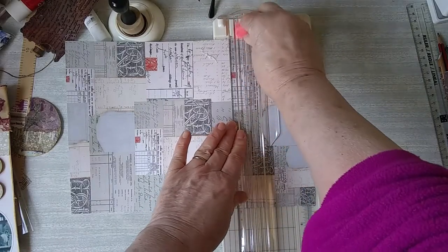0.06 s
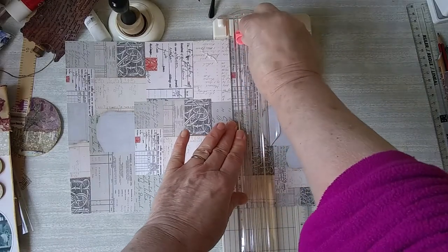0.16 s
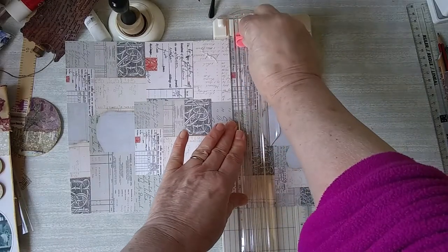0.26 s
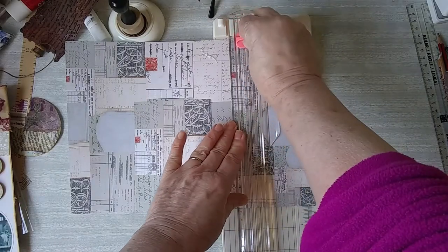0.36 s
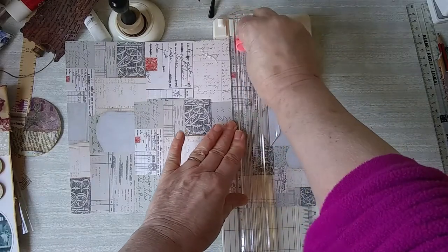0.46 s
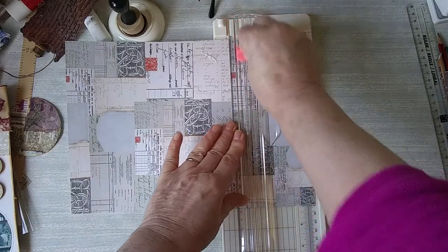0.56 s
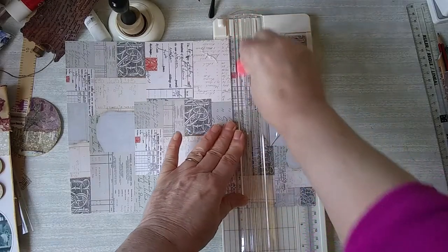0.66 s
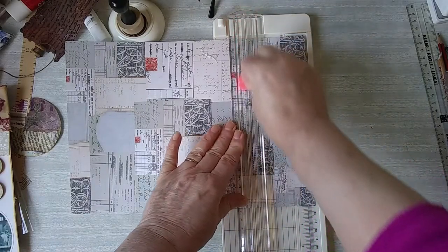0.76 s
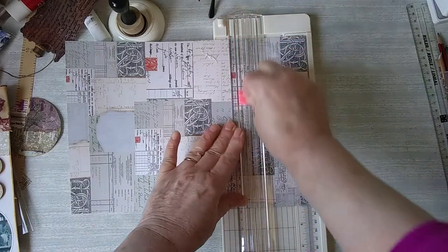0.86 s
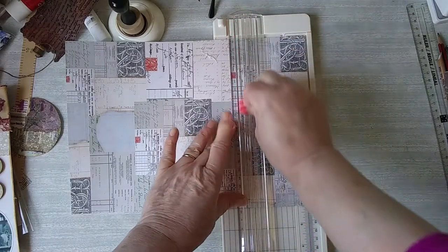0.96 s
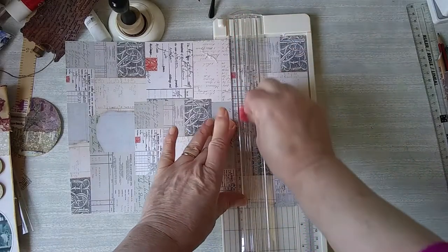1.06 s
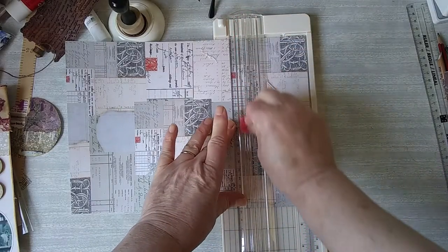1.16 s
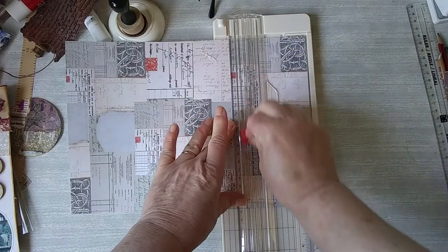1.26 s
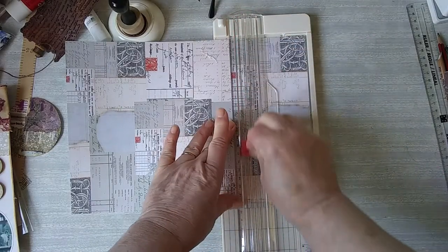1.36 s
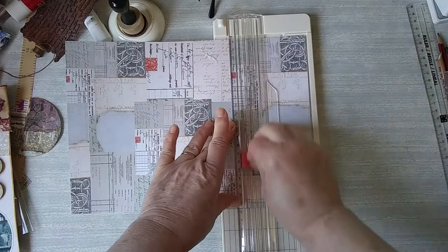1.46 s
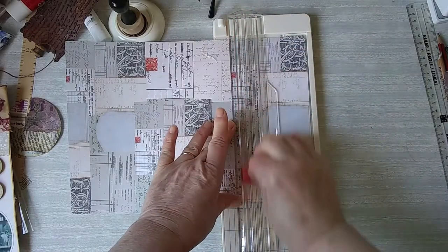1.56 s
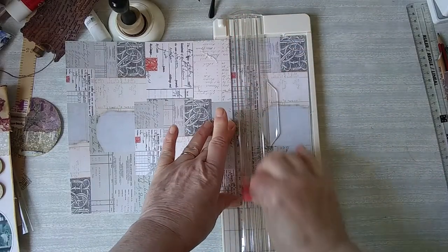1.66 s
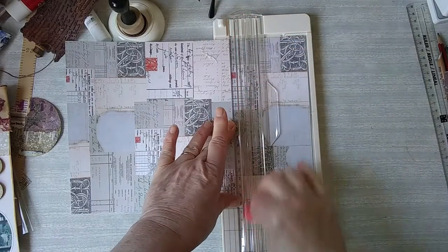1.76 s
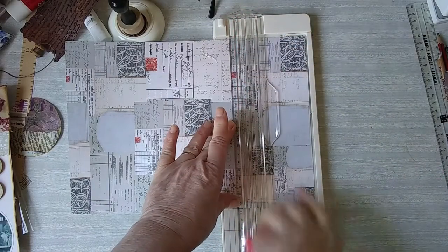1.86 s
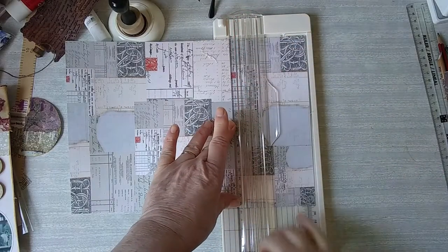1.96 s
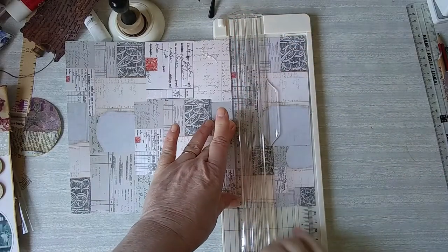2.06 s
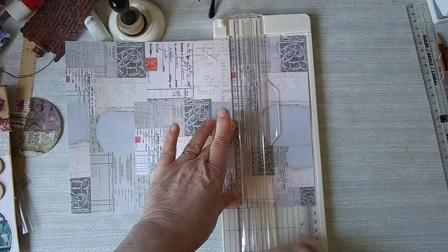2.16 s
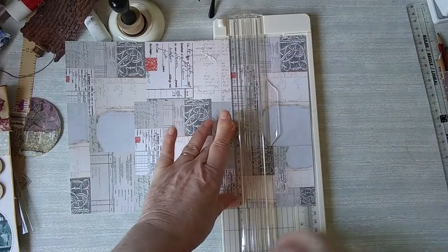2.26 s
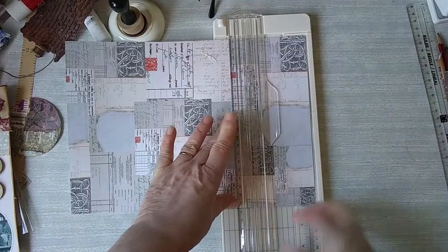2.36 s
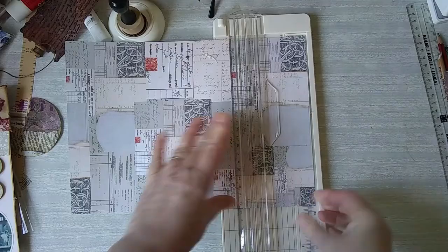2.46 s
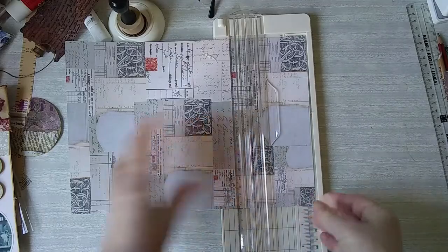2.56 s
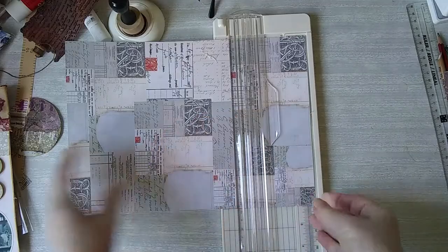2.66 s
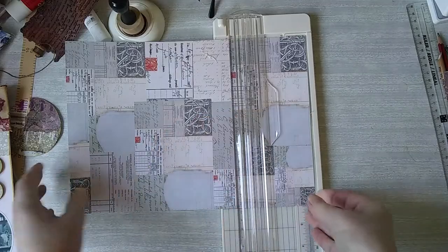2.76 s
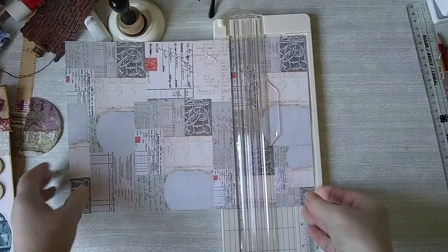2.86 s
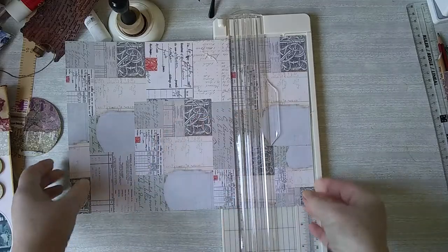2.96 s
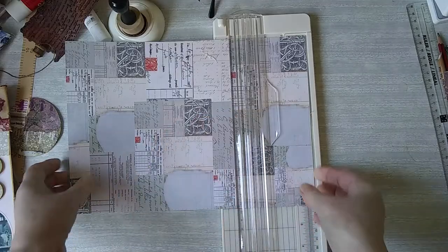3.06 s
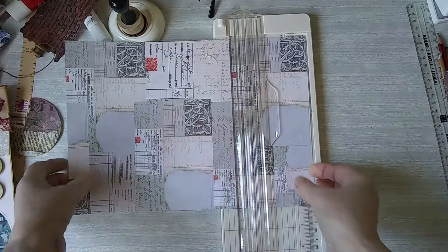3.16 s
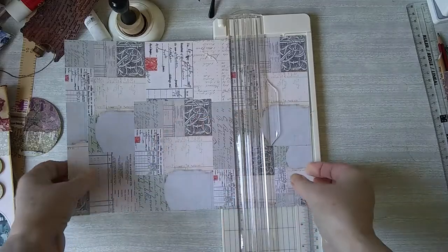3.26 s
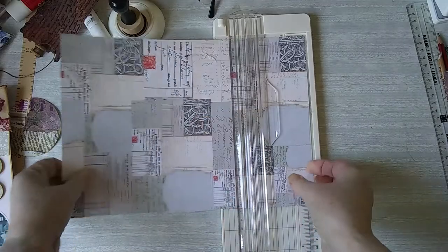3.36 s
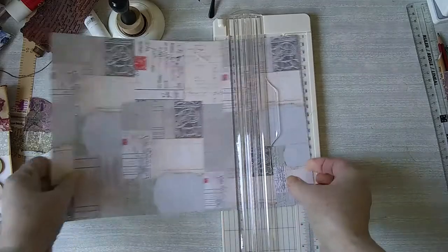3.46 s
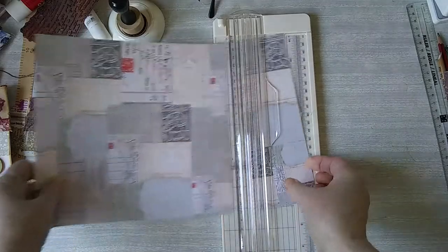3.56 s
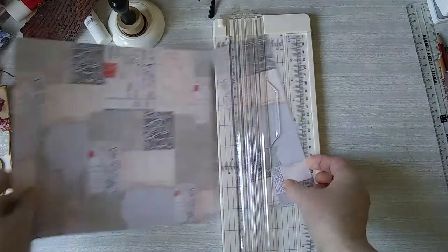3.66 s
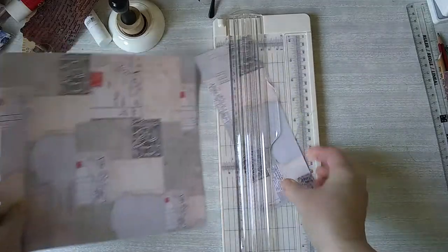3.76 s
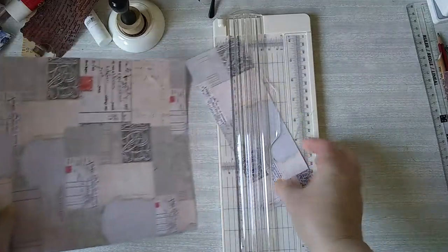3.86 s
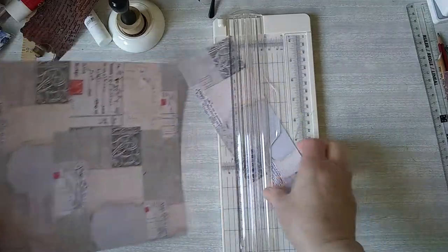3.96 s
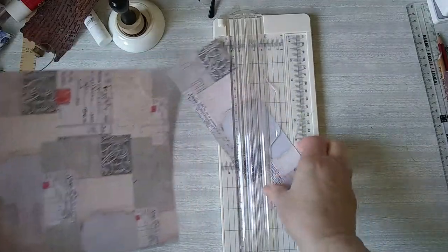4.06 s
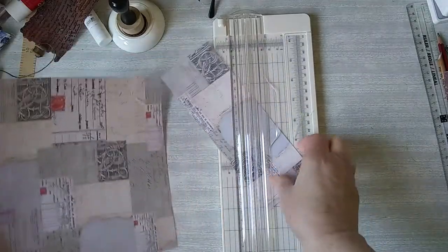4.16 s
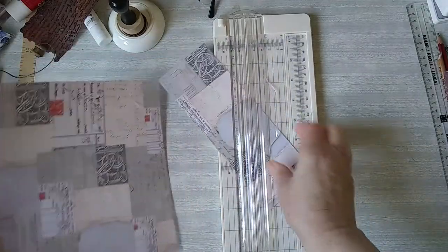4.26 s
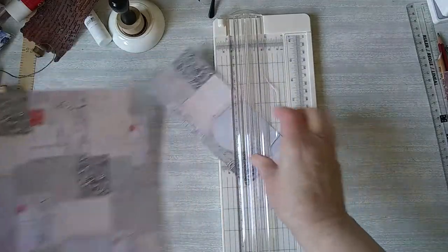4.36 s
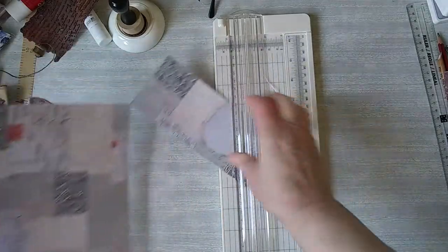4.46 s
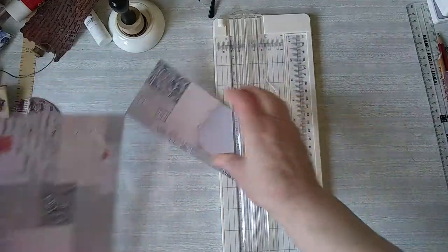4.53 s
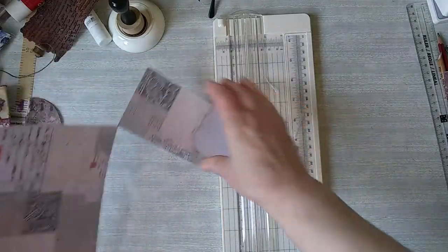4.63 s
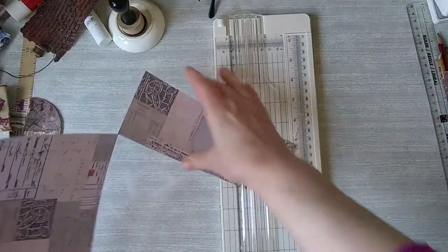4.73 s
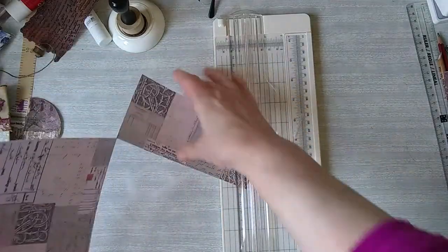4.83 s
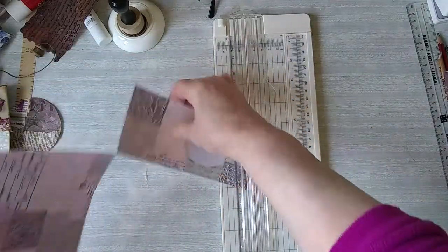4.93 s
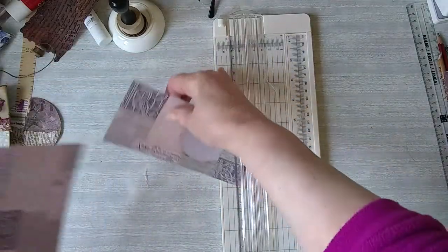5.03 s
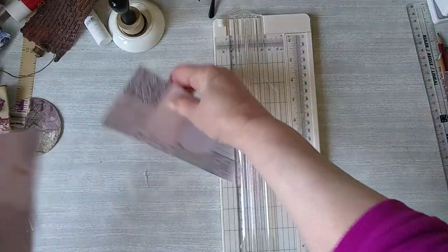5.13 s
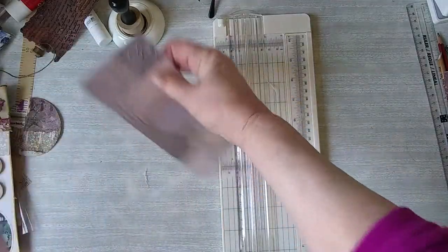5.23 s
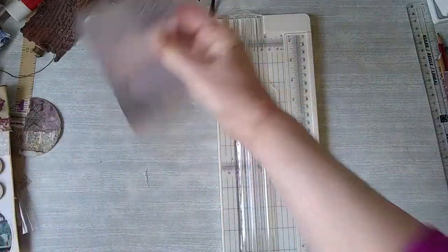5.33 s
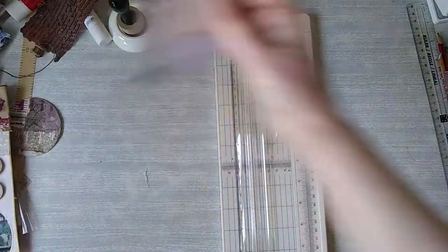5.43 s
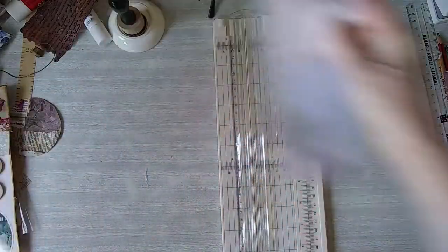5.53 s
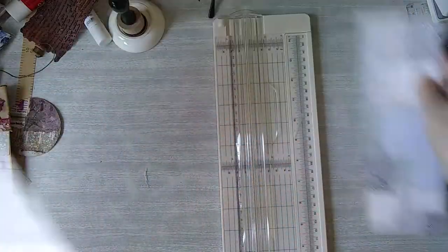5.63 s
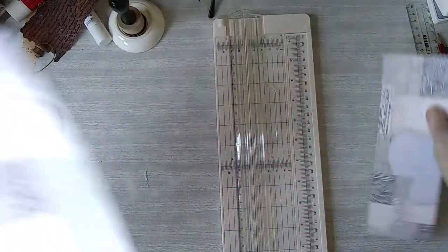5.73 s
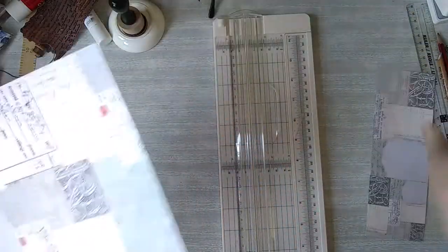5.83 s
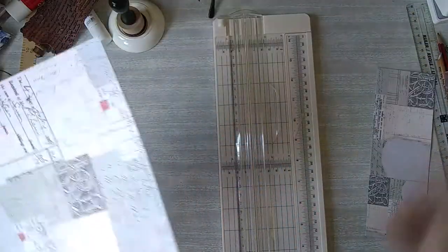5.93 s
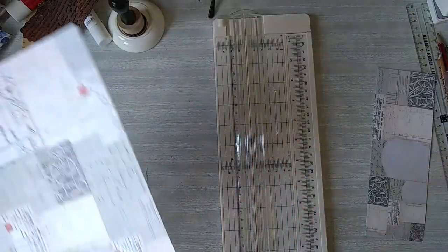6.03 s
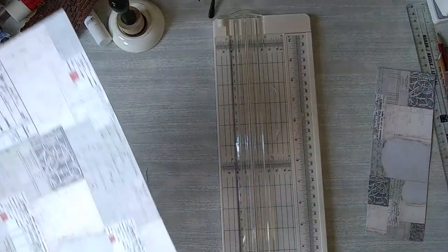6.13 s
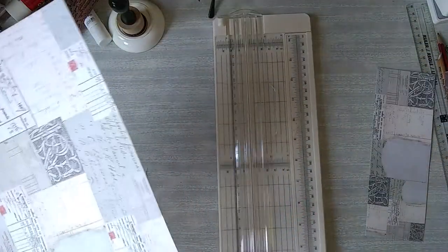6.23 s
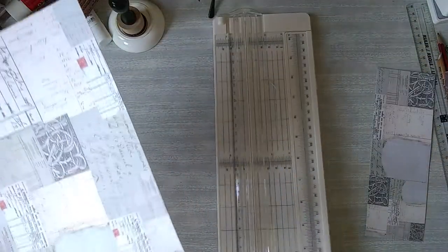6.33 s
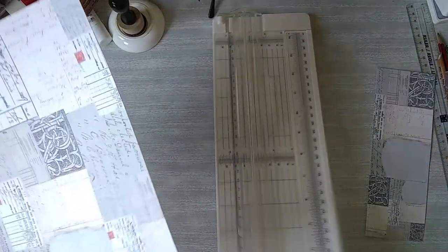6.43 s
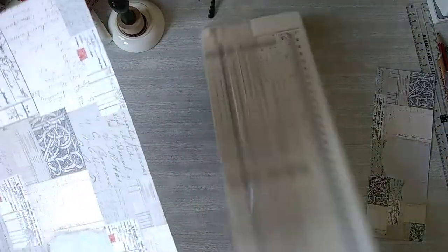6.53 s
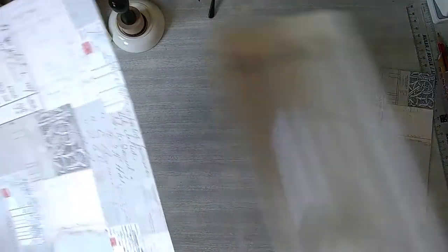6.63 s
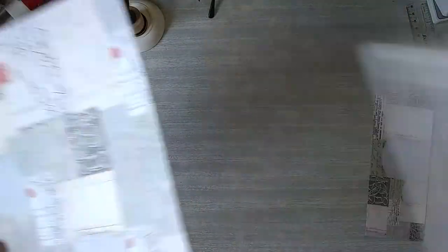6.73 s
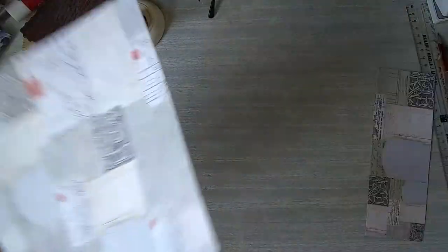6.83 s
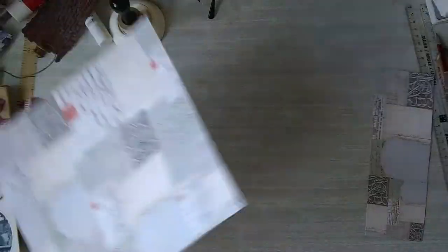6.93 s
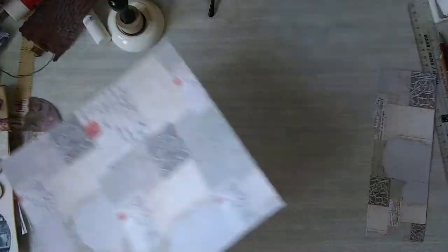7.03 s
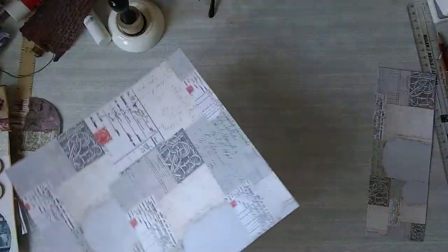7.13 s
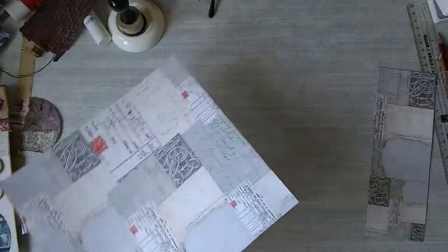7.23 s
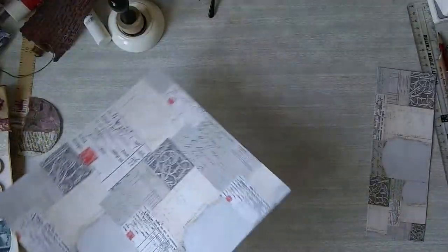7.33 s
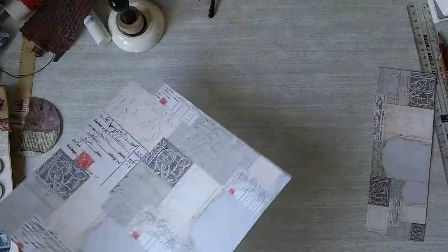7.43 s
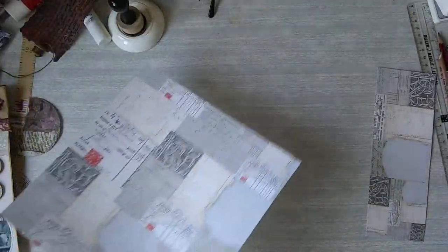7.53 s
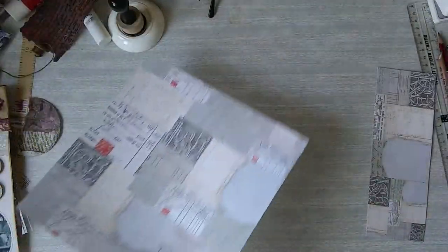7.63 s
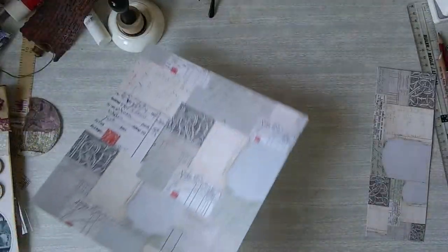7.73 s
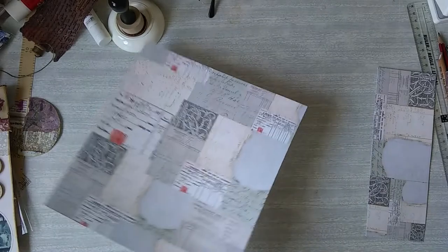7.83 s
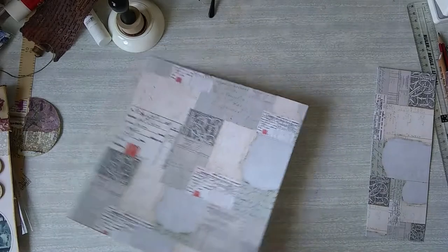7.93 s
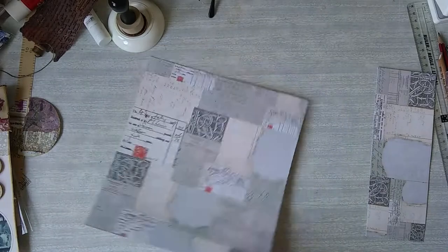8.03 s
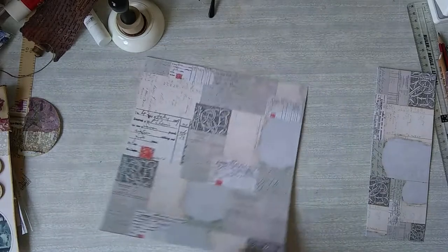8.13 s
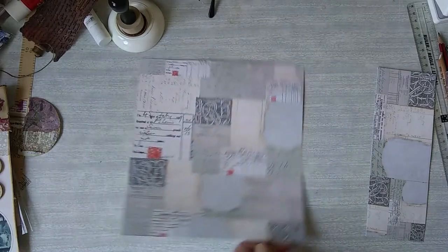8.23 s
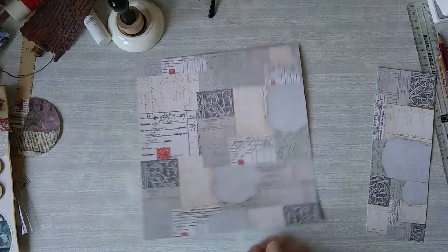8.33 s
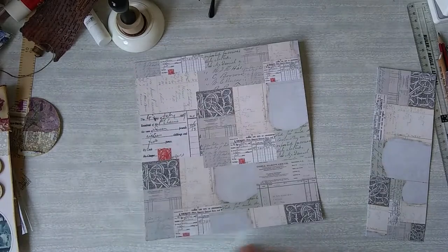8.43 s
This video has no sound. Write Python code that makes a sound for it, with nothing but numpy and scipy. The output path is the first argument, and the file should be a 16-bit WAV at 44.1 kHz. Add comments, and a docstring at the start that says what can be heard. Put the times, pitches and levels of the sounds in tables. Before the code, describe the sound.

Over the faint hush of a quiet room, a paper trimmer's slider is nudged with small clicks at about 0.2 seconds. From 0.4 to 1.8 seconds the blade rasps through card in one stroke, drumming the plastic bed. A tiny ping follows near 2 seconds, then scattered light taps. From about 3.4 to 5 seconds the cut pieces are dragged free with uneven papery hisses and small knocks on plastic and desk. Around 5.2 seconds the offcut is flicked away with a bright swish and a cluster of knocks, and card snaps sharply at 5.8. From 6.2 to 6.5 seconds the trimmer clatters as it is lifted, the loudest event. The sheet fans soft, low puffs of air around 7.3 seconds, then glides over the desk with a fine hiss, ending with light ticks near 8.4. The sound is close, in wide stereo.

```python
"""A sliding trimmer cuts a sheet of card on a desk, under a camera in a quiet room.
First the blade is nudged in and rasps down its rail, parting fibres and drumming the plastic bed.
Then the pieces are dragged free with a hiss and the offcut is flicked away. The trimmer clatters
as it is lifted off; last, the sheet fans the air and glides back into place. Throughout, the camera
widens its stereo picture by subtracting each microphone, delayed, from the other."""
import sys
import numpy as np
from scipy import signal
from scipy.fft import rfft, irfft, next_fast_len
from scipy.io import wavfile
from scipy.ndimage import uniform_filter1d

SR = 44100
rng = np.random.default_rng(int(sys.argv[2]) if len(sys.argv) > 2 else 0)


def materialize(psi):
    """Save the field psi as 16-bit PCM at rate SR to the path in sys.argv[1].

    A 1-D psi becomes a single channel; in a 2-D psi each row is a channel.
    """
    bounded = np.clip(np.atleast_2d(psi).T, -1, 1)
    quanta = np.round(bounded * 32767).astype(np.int16)
    wavfile.write(sys.argv[1], SR, quanta)


N = 374409
TIME = np.arange(N) / SR

# the blade's long stroke: t/s, drumming of the bed/dB, rasp of the fibres/dB
CUT_STROKE = [(0.42, -47, -53.5), (0.46, -42, -49.5), (0.59, -46.5, -40), (0.70, -46.5, -40),
              (0.848, -38.5, -40.5), (0.9, -44, -41.5), (1.06, -46, -42), (1.25, -47, -39),
              (1.38, -47, -40), (1.514, -48.5, -40), (1.604, -45.5, -38), (1.73, -50.5, -37),
              (1.78, -41, -39.5)]
# nudges before the stroke: t/s, length/s, speed peak/share of length, drumming/dB, rasp/dB
BLADE_NUDGES = [(.198, 0.13, 0.16, -47.5, -54.5), (.335, 0.12, 0.15, -48.5, -54)]
# tone of the cut at the far and near ends of the rail: f/Hz, level/dB
CUT_FAR_TONE = [(40, -19), (90, -14.5), (165, -1.5), (240, -24), (430, -3), (530, -13), (780, -2.5),
                (1050, -17), (1250, -9.5), (2000, -2), (4300, -0.5), (6200, -1), (10000, -5.5),
                (14000, -10.5)]
CUT_NEAR_TONE = [(40, -39), (90, -6.5), (165, -1.5), (240, -11), (380, -4), (600, -7.5), (950, -7.5),
                 (1700, -13), (2300, -7.5), (3700, -2.5), (5000, -5.5), (6000, -7.5), (10000, -9),
                 (14000, -15.5)]
# desk, bed and rail speak as the slider passes: t/s, spread/s, f/Hz, half-width/Hz, level/dB
RAIL_RESONANCES = [(0.584, 0.05, 164, 13, -43), (1.4, 0.13, 164.7, 7.3, -48), (1.0, 0.35, 118, 8.6, -53),
                   (1.36, 0.73, 300, 19, -58), (0.574, 0.11, 431, 14, -47.5), (1.2, 0.091, 398, 28, -49.5),
                   (1.77, 0.042, 452, 24, -54), (0.47, 0.04, 790, 35, -48), (0.6, .07, 785, 45, -43.5),
                   (0.745, 0.096, 867, 66, -47.5), (0.55, 0.042, 660, 47, -49), (0.81, 0.21, 690, 66, -46),
                   (0.66, 0.096, 970, 17, -54), (0.667, 0.093, 1232, 37, -48),
                   (1.253, 0.053, 3470, 59, -46), (1.15, 0.22, 1590, 41, -54),
                   (1.34, 0.47, 1760, 157, -48.5), (1.15, 0.05, 5700, 160, -56),
                   (1.5, 0.14, 5660, 320, -49), (1.63, 0.11, 1155, 50, -50.5), (1.62, 0.077, 3970, 90, -50),
                   (1.6, 0.09, 3600, 110, -51), (1.4, 0.25, 2860, 34, -55)]
# card and trimmer pushed over each other and the desk, then the big sheet over the bare desk:
# t/s, length/s, speed peak/share of length, drumming/dB, hiss/dB
CARD_SLIDES = [(2.63, 0.22, 0.61, -59, -76), (2.93, 0.34, 0.41, -61, -73), (3.4, 0.3, 0.22, -51, -43.5),
               (3.53, 0.44, 0.24, -48, -39.5), (3.77, 0.082, 0.89, -52, -44.5),
               (3.91, 0.31, 0.19, -49, -46), (4.27, 0.34, 0.43, -53.5, -47), (4.52, 0.16, 0.49, -53, -51.5),
               (4.62, 0.15, 0.78, -57.5, -65), (4.85, 0.44, 0.16, -52.5, -50.5),
               (4.955, 0.055, 0.48, -44.5, -38), (5.1, 0.085, 0.5, -56, -37),
               (5.09, 0.205, 0.58, -47.5, -30.5), (5.38, 0.14, 0.59, -58, -54.5),
               (5.75, 0.052, 0.66, -47.5, -55), (6.18, 0.39, 0.5, -46.5, -55),
               (6.42, 0.5, 0.51, -58.5, -64.5), (6.73, 0.43, 0.43, -55, -59), (7.02, 0.47, 0.58, -62, -63)]
SHEET_GLIDES = [(7.46, 0.15, 0.32, -60, -51.5), (7.52, 0.24, .5, -67, -66), (7.68, 0.11, 0.4, -70, -51),
                (7.64, 0.21, 0.4, -59.5, -46), (7.74, 0.21, 0.37, -70, -54.5),
                (7.84, .26, 0.55, -63.5, -53.5), (8.0, 0.29, 0.35, -73, -58.5),
                (8.19, .12, 0.34, -76, -50.5), (8.295, .058, 0.36, -82, -52), (8.33, 0.28, 0.13, -68, -60)]
# card skids where it is touched or lands: t/s, decay/s, drumming/dB, hiss/dB
CARD_SCUFFS = [(1.785, 0.19, -62, -59.5), (1.96, 0.1, -66, -59.5), (2.905, 0.042, -56.5, -72),
               (3.104, 0.1, -52.5, -61.5), (3.295, 0.25, -55.5, -60.5), (3.41, .03, -51, -50),
               (4.158, 0.57, -58, -67), (4.98, 0.042, -44, -45), (5.28, 0.026, -37, -46),
               (5.795, 0.018, -43, -40), (5.825, 0.03, -46, -39), (6.192, 0.032, -34.5, -45.5),
               (6.285, 0.04, -44, -43), (6.467, 0.011, -45, -48.5), (6.965, 0.019, -44.5, -44.5)]
# tone of card sliding on its face, whisked on its edge and gliding on the desk: f/Hz, level/dB
FACE_TONE = [(40, -37), (130, -14), (300, 0.5), (450, 1), (750, -14.5), (1100, -5.5), (1700, -1), (2400, 1),
             (3200, 2.5), (4600, 1.5), (7000, -2), (10500, -7.5), (14000, -24.5)]
EDGE_TONE = [(40, -7), (130, -2.5), (300, 5), (800, 6), (1200, -2), (1700, -4.5), (3300, -2.5),
             (4600, -6.5), (7000, -6.5), (10500, -6), (14000, -11)]
GLIDE_TONE = [(40, -12), (130, -11), (450, 8), (800, 1.5), (1500, -3), (2400, -4.5), (3300, -3),
              (4600, -4.5), (6000, -5), (8000, -3.5), (10300, -5.5), (14000, -12)]
# hits on trimmer and desk: t/s, thud/dB, ring/dB, crack/dB, thud tilt and ring tilt/(dB per octave)
KNOCK_HITS = [(0.215, -53, -49, -44, 8, 2), (0.239, -44, -43, -38.5, 11, 0), (0.341, -52, -57, -43, 0, 0),
              (2.135, -46, -47, -66, 6, -5), (2.148, -46.5, -47, -64, 2, -7), (2.385, -71, -41, -46, -5, 2),
              (2.645, -48, -46, -55, 1, -3), (2.774, -64, -47, -53, 2, 2), (2.7851, -47, -46, -56, -6, 5),
              (2.908, -42.5, -48, -48, -6, 5), (3.104, -46, -43, -47, -2, 4), (3.293, -53, -45, -52, 3, -5),
              (3.3394, -46, -41, -58, -2, -10), (3.348, -48, -43, -58, 2, -7),
              (3.431, -43, -38.5, -46, 1, -5), (3.438, -46, -37, -46, 4, -2),
              (3.6666, -38.5, -31.5, -43, 18, -9), (3.733, -39, -37, -54, 2, -7),
              (3.9881, -39, -29.5, -48, 4, -5), (4.034, -49, -39.5, -46, 6, -8),
              (4.107, -48, -41.5, -56, 7, -14), (4.1573, -43, -39, -36, 3, -2),
              (4.861, -43.5, -44.5, -63, 9, 2), (4.984, -36.5, -42, -38, 9, 4),
              (5.224, -28.5, -22, -22.5, 3.5, -7), (5.2305, -23, -18, -30, 4, 0),
              (5.263, -42, -26, -22, 7, -5), (5.2672, -28.5, -27, -23.5, 6, -8),
              (5.283, -40, -36, -46, -1, -10), (5.297, -40, -27, -37, -4, 3),
              (5.5516, -42, -63, -65, 1, -3), (5.7609, -48, -46.5, -56, 6, -2),
              (5.8033, -48, -22, -31, 7, 3.5), (5.819, -54, -42, -30, 4, 4), (5.847, -48, -35, -34, 4, 2),
              (6.199, -27, -31, -31, -5, -8), (6.202, -34, -26, -35, 6, -2), (6.211, -31, -26, -35, -8, 0),
              (6.217, -39, -24, -38, -2, -2), (6.231, -33, -24, -28, -3, -1),
              (6.242, -42, -33, -44, -3, -6), (6.2864, -38, -26, -31, 3, 11),
              (6.2942, -30, -22.5, -31, 7, 0), (6.302, -45, -24, -27, 3, 7), (6.311, -32, -27, -20, -6, 0),
              (6.318, -20, -8, -11, 4, -2), (6.3282, -23.5, -20, -19.5, 8.5, -4),
              (6.343, -35, -30, -33, 11, 2), (6.347, -42, -29, -30, 2, 2), (6.421, -39, -30.5, -47, 8, -3),
              (6.43, -52, -34, -49, 2, -2), (6.455, -58, -38, -40, 0, 4), (6.468, -55, -30, -46, 2, -1),
              (6.475, -52, -33, -44, 0, -2), (6.559, -51, -45, -52, 9, 0), (6.9806, -56, -41, -44, 0, -16),
              (7.805, -49, -55, -60, 6, 0), (8.235, -64, -45, -48, 0, 9.5), (8.3587, -48, -50, -46, 9, -15),
              (8.3872, -48.5, -48, -44, 3, -3)]
# modes of the desk and of the plastic bed: f/Hz, level/dB, t60/s
DESK_MODES = [(120.4, -10.5, 0.22), (167, 0, 0.15), (290, -5.5, 0.07), (303.4, 1, 0.088), (400, -8, 0.07),
              (443.6, 0, 0.085)]
BED_MODES = [(557, -11.5, 0.05), (637, -6, 0.078), (708, -8.5, 0.08), (789, -1, 0.081), (869, 1, 0.062),
             (969, 2, 0.045), (1079, 2.5, 0.053), (1142, -2.5, 0.065), (1230, -7.5, 0.035),
             (1346, -8.5, 0.08), (1662, -6, 0.05), (1828, -6, 0.049), (2780, -20, 0.055), (3083, -15, 0.06),
             (3570, -17, 0.04)]
# ticks of card edges and fingernails: t/s, level/dB
SNAP_HITS = [(1.275, -44), (1.966, -39), (3.298, -44), (3.340, -37.5), (3.344, -41), (3.412, -46),
             (4.157, -32.5), (4.161, -37), (4.733, -43), (4.864, -45), (5.803, -26), (5.8068, -9.5),
             (5.83, -31), (6.1936, -30.5), (6.2858, -22), (6.289, -22), (6.32, -34), (6.331, -25),
             (6.344, -24), (6.477, -34), (6.917, -38), (6.965, -37)]
# air fanned at the microphones by the sheet: t/s, level/dB, spread/s
AIR_PUFFS = [(5.883, -46, 0.013), (7.24, -53, 0.028), (7.296, -45, 0.013), (7.42, -59, 0.049),
             (7.512, -45, 0.028)]
# tone of a crack, a snap and the room's hush: f/Hz, level/dB
CRACK_TONE = [(60, -33), (300, -13), (1000, -2), (1600, 4), (2300, 13), (2800, 4.5), (3500, 7.5),
              (4600, -5.5), (6000, -7), (7500, -18), (11000, -24), (14000, -40)]
SNAP_TONE = [(40, -32), (100, -26), (400, 10.5), (1000, 0), (2000, 18), (3500, 11.5), (6000, 8),
             (10000, 2.5), (14000, -4)]
HUSH_TONE = [(25, -12), (60, -6.5), (120, -1.5), (200, -2.5), (400, -5), (700, -11), (1100, -15),
             (2000, -18.5), (4000, -22), (8000, -26), (14000, -28)]
# overall tone with a narrow dip near 2.25 kHz and a softened top: f/Hz, level/dB
OUTPUT_EQ = [(60, -0.5), (1700, -1.5), (2000, -1), (2250, -3.5), (2500, -0.5), (2750, 0), (3300, -2),
             (4100, 0), (4450, 0.5), (5000, 0.5), (12000, 0.5), (14000, -4)]
# how alike left and right are for cut, card, hush and reflections: f/Hz, coherence
CUT_COHERENCE = [(100, 0.96), (400, 0.99), (900, 0.52), (1800, 0.54), (4000, 0.3), (8000, 0.043),
                 (14000, 0.072)]
CARD_COHERENCE = [(100, 0.72), (400, 0.97), (1000, 0.44), (1800, 0.5), (4000, 0.25), (8000, 0.065),
                  (14000, 0.092)]
HUSH_COHERENCE = [(50, 0.43), (300, 0.34), (1000, -0.073), (3000, -0.095), (14000, 0.036)]
ROOM_COHERENCE = [(120, 1), (450, 0.71), (1000, 0.88), (2500, 0.24), (14000, 0.22)]
# the room's tail: f/Hz, t60/s
ROOM_DECAY = [(120, 0.46), (500, 0.19), (1000, 0.28), (3000, 0.19), (8000, 0.099), (14000, 0.17)]
# stereo widening: f/Hz, share of the other microphone that is subtracted
WIDENING = [(100, 0.75), (1000, 0.59), (2250, 0.9), (4500, 0.45), (6700, 0.2), (9000, 0.11), (14000, 0.025)]
# the slider's ping: f/Hz, level/dB, t60/s
SLIDER_MODES = [(3280, 0, 0.063)]


def blade():
    """The blade parts fibres; bed and rail ring differently as it travels from far end to near end."""
    grit = paired(fibres(per_s=16000, spread_db=1, clump_db=1.3, clump_hz=160), CUT_COHERENCE)
    grit = wander(grit, depth_db=3.7, patch_frames=22)
    far, near = body_and_hiss(grit, CUT_FAR_TONE), body_and_hiss(grit, CUT_NEAR_TONE)
    travel = np.clip((TIME - .8) / 0.14, 0, 1)
    body, rasp = (1 - travel) * far + travel * near
    drumming, rasping = np.hypot(stroke(), rubbed(BLADE_NUDGES, push))
    # the slider's chatter rings the rail only while it moves
    chatter = paired(rng.standard_normal((2, N)), CUT_COHERENCE)
    moving = np.clip(rasping / gain_of(-41.5), 0, 1)
    rail = sum(gain_of(db) * swell(s, spread) * resonance(chatter, hz, 2 * half_width)
               for s, spread, hz, half_width, db in RAIL_RESONANCES)
    return body * drumming * gain_of(-2) + rasp * rasping * gain_of(-1) + moving * rail


def stroke(bite_s=0.013, run_out_s=0.014):
    """Drumming and rasp envelopes as the blade bites, cuts and runs out of the sheet."""
    s, *levels = np.transpose(CUT_STROKE)
    inside = np.clip(np.minimum((TIME - s[0]) / bite_s, (s[-1] - TIME) / run_out_s) + 1, 0, 1)
    return inside * gain_of([np.interp(TIME, s, db) for db in levels])


def card():
    """Card rubs over plastic and desk; on its edge it hisses brightly and hardly drums."""
    grit = paired(fibres(per_s=6000, spread_db=1, clump_db=1.17, clump_hz=88), CARD_COHERENCE)
    grit = wander(grit, depth_db=2.2, patch_frames=14)
    drumming, hissing = np.hypot(rubbed(CARD_SLIDES, push), rubbed(CARD_SCUFFS, skid))
    face, edge = body_and_hiss(grit, FACE_TONE), body_and_hiss(grit, EDGE_TONE)
    on_edge = hissing / (hissing + 0.54 * drumming + 1e-12)
    body, hiss = (1 - on_edge) * face + on_edge * edge
    hollow_bed = gain_of(-17) * resonance(grit, hz=769, width_hz=65) + gain_of(-8) * catches()
    # a finger rubs the plastic and rings it faintly
    finger = gain_of(-66) * push(start_s=2.63, length_s=.2, peak_share=.5)
    squeak = finger * resonance(grit, hz=1390, width_hz=320)
    return (body + hollow_bed) * drumming + hiss * hissing + squeak


def catches():
    """The card's edge catches at random, each bump ringing the plastic bed; rms one."""
    bumps = fibres(per_s=70, spread_db=2, clump_db=1, clump_hz=10)[:1]
    t = np.arange(SR // 10) / SR
    bed = ring(BED_MODES, t, rise_s=0.00059, scatter_db=5.5, width=0.53, tilt_db=-7)
    return evened(signal.oaconvolve(bumps, bed, axes=1)[:, :N])


def sheet():
    """The big sheet skims the bare desk with a fine, airy hiss."""
    grit = paired(fibres(per_s=12000, spread_db=1, clump_db=1, clump_hz=49.5), CARD_COHERENCE)
    grit = wander(grit, depth_db=2.5, patch_frames=24)
    body, hiss = body_and_hiss(grit, GLIDE_TONE)
    drumming, hissing = rubbed(SHEET_GLIDES, push)
    return lean_left(body * drumming + hiss * hissing, db=.5)


def fibres(per_s, spread_db, clump_db, clump_hz):
    """Tiny snaps of uneven size that come in clumps as the contact sticks and slips."""
    size = gain_of(spread_db * np.minimum(rng.exponential(1, (2, N)), 5))
    grains = size * rng.choice([-1, 1], (2, N)) * (rng.random((2, N)) < per_s / SR)
    lowpass = signal.butter(2, clump_hz, fs=SR, output="sos")
    clumps = evened(signal.sosfilt(lowpass, rng.standard_normal(N)))
    return evened(grains * gain_of(clump_db * clumps))


def wander(x, depth_db, patch_frames):
    """Upper resonances swell and fade as the contact point travels; the bass stays steady."""
    hz, _, spectrum = signal.stft(x, SR, nperseg=512, noverlap=384)
    patches = uniform_filter1d(rng.standard_normal(spectrum.shape[1:]), patch_frames, axis=1)
    patches = evened(uniform_filter1d(patches, 2, axis=0))
    depth = depth_db * np.clip(hz / 1800, 0, 1)[:, None]
    swells = gain_of(depth * patches)
    swells /= np.sqrt(np.mean(swells ** 2, axis=1, keepdims=True))
    return evened(signal.istft(spectrum * swells, nperseg=512, noverlap=384)[1][:, :N])


def body_and_hiss(grit, tone):
    """Shapes friction grit and splits it into low drumming and high hiss, each of rms one."""
    friction = coloured(grit, tone)
    body = signal.sosfiltfilt(signal.butter(2, 1500, fs=SR, output="sos"), friction)
    return np.array([evened(body), evened(friction - body)])


def push(start_s, length_s, peak_share):
    """Friction envelope of one move: it grows and fades with the speed of the hand."""
    peak_s = length_s * np.clip(peak_share, .05, .95)
    progress = np.interp(TIME - start_s, [0, peak_s, length_s], [0, .5, 1])
    speed = np.sin(np.pi * progress).clip(0)
    return speed ** 1.36


def skid(start_s, decay_s, attack_s=0.0039):
    """Friction envelope of a brief contact: a quick attack, then it dies away."""
    t = np.maximum(TIME - start_s, 0)
    return np.minimum(t / attack_s, 1) * np.exp(-t / decay_s)


def rubbed(moves, shape):
    """Drumming and hiss envelopes of a table of moves; their powers add."""
    power = np.zeros((2, N))
    for *timing, drumming_db, hiss_db in moves:
        power += (gain_of([[drumming_db], [hiss_db]]) * shape(*timing)) ** 2
    return np.sqrt(power)


def knocks():
    """Each knock cracks, rings the plastic bed and, more slowly, moves the desk."""
    out, t = np.zeros((2, N)), np.arange(SR // 5) / SR
    for s, thud_db, ring_db, crack_db, thud_tilt, ring_tilt in KNOCK_HITS:
        thud = ring(DESK_MODES, t, rise_s=0.0029, scatter_db=3.5, width=0.067, tilt_db=thud_tilt)
        bed = ring(BED_MODES, t, rise_s=0.0007, scatter_db=1.5, width=0.39, tilt_db=ring_tilt)
        contact = crack(t, CRACK_TONE, rise_s=.0005, decay_s=.0026, tail_db=-10, tail_s=.01, width=.51)
        add(out, s, gain_of(thud_db) * thud + gain_of(ring_db) * bed + gain_of(crack_db) * contact)
    ping = ring(SLIDER_MODES, t, rise_s=.0004, scatter_db=0, width=0.35)
    add(out, 1.962, gain_of(-47.5) * ping)  # the slider is let go
    return lean_left(out, db=.8)


def snaps():
    """Card edges and fingernails snap: bright ticks with no ring."""
    out, t = np.zeros((2, N)), np.arange(SR // 10) / SR
    for s, db in SNAP_HITS:
        tick = crack(t, SNAP_TONE, rise_s=.0004, decay_s=.0009, tail_db=-9, tail_s=.0043, width=.8)
        add(out, s, gain_of(db) * tick)
    return out


def ring(modes, t, rise_s, scatter_db, width, tilt_db=0):
    """One blow on a set of modes, peak one; where it lands sets the strength and phase of each."""
    hz, db, t60 = np.transpose(modes)[:, :, None]
    strength, detune, phase, stereo_phase = rng.standard_normal((4, len(modes), 1))
    angle = 2 * np.pi * hz * (1 + 0.0022 * detune) * t + 1.07 * phase
    attack = 1 - np.exp(-t / rise_s)
    jolt = 1 + 1.6 * np.exp(-t / 0.0035)  # the first swing is stronger than the ring it leaves
    mode_db = db + tilt_db * np.log2(hz / hz[0]) + scatter_db * strength
    envelope = gain_of(mode_db - 60 * t / t60) * attack * jolt
    x = np.array([(envelope * np.sin(angle + side * width * stereo_phase)).sum(0) for side in (-1, 1)])
    return x / abs(x).max()


def crack(t, tone, rise_s, decay_s, tail_db, tail_s, width):
    """A short burst of contact noise with a weaker chatter behind it, peak one."""
    mid, side = rng.standard_normal((2, len(t)))
    attack = 1 - np.exp(-t / rise_s)
    envelope = attack * (np.exp(-t / decay_s) + gain_of(tail_db) * np.exp(-t / tail_s))
    x = coloured(np.array([mid + width * side, mid - width * side]) * envelope, tone)
    return x / abs(x).max()


def room(x, early_db, late_db):
    """Reflections from the desk and things on it, then a short tail that dies faster in the treble."""
    size = SR // 2
    hz, frame_s, noise = signal.stft(rng.standard_normal((2, size)), SR, nperseg=256)
    decay = gain_of(-60 * frame_s / curve_at(ROOM_DECAY, hz)[:, None])
    tail = signal.istft(noise * decay, SR, nperseg=256)[1][:, :size]
    t = np.arange(size) / SR
    tail *= np.clip(t / 0.011, 0, 1)
    early = rng.standard_normal((2, size)) * (rng.random((2, size)) < .02)
    early *= (t > .003) * np.exp(-t / 0.026)
    response = (gain_of(early_db) * evened(early) + gain_of(late_db) * evened(tail)) / np.sqrt(size)
    return signal.fftconvolve(x, paired(response, ROOM_COHERENCE), axes=1)[:, :N]


def air():
    """The hush of the room, and soft low puffs when the sheet fans the microphones."""
    noise = paired(rng.standard_normal((2, N)), HUSH_COHERENCE)
    hush = gain_of(-57.5) * evened(coloured(noise, HUSH_TONE))
    gusts = sum(gain_of(db) * swell(s, spread) for s, db, spread in AIR_PUFFS)
    eddies = coloured(rng.standard_normal((2, N)),
                      tone=[(25, -17), (80, 6), (130, -5.5), (300, -12), (1500, -62)])
    return lean_left(hush, db=.4) + gusts * evened(eddies)


def gain_of(db):
    """Decibels to amplitude."""
    return np.exp(np.asarray(db) * (np.log(10) / 20))


def evened(x):
    """Scales to an rms of one."""
    return x / np.sqrt(np.mean(x ** 2) + 1e-20)


def lean_left(x, db):
    """Pans by lifting the left channel and lowering the right."""
    return x * gain_of([[db], [-db]])


def swell(centre_s, spread_s):
    """A bell-shaped fade in and out."""
    return np.exp(-.5 * ((TIME - centre_s) / spread_s) ** 2)


def curve_at(points, hz):
    """Joins (f/Hz, value) points on a log-frequency axis."""
    f, value = np.transpose(points)
    return np.interp(np.log(hz + 1), np.log(f + 1), value)


def add(mix, s, sound):
    """Drops a stereo sound into the mix at time s."""
    part = mix[:, round(s * SR):][:, :sound.shape[1]]
    part += sound[:, :part.shape[1]]


def coloured(x, tone):
    """Minimum-phase EQ through (f/Hz, level/dB) points."""
    log_gain = np.log(gain_of(curve_at(tone, abs(np.fft.fftfreq(2048, 1 / SR)))))
    taps = np.fft.ifft(np.exp(np.conj(signal.hilbert(log_gain)))).real[:1024]
    return signal.oaconvolve(x, taps[None], axes=1)[:, :x.shape[1]]


def resonance(x, hz, width_hz):
    """Two passes of a narrow band filter give a steep-sided resonance, rms one."""
    b, a = signal.iirpeak(hz, hz / width_hz, fs=SR)
    return evened(signal.lfilter(b, a, signal.lfilter(b, a, x)))


def paired(x, coherence):
    """Turns two unrelated signals into a microphone pair of given coherence."""
    size = next_fast_len(x.shape[1])
    a, b = rfft(x, size)
    alike = np.clip(curve_at(coherence, np.fft.rfftfreq(size, 1 / SR)), -.99, .99)
    mid, side = a * np.sqrt((1 + alike) / 2), b * np.sqrt((1 - alike) / 2)
    return irfft(np.array([mid + side, mid - side]), size)[:, :x.shape[1]]


def scene():
    """Friction and blows in the room, over its hush."""
    rubbing = blade() + card() + sheet()
    blows = knocks() + snaps()
    blow_echoes = room(blows, early_db=-17, late_db=-14)
    rub_echoes = room(rubbing, early_db=-11.5, late_db=-12.5)
    return rubbing + rub_echoes + blows + blow_echoes + air()


def record(dry):
    """Each channel loses a delayed, dulled copy of the other; then the output EQ and a high cut."""
    delay_samples, high_cut_hz = 19.5, 14500
    size = next_fast_len(N + SR // 10)
    hz, spectrum = np.fft.rfftfreq(size, 1 / SR), rfft(dry, size)
    delay = np.exp(-2j * np.pi * hz * delay_samples / SR)
    crossfeed = np.clip(curve_at(WIDENING, hz), 0, 1) * delay * spectrum[::-1]
    wide = irfft((spectrum - crossfeed) * gain_of(curve_at(OUTPUT_EQ, hz)), size)[:, :N]
    high_cut = signal.firwin(511, high_cut_hz, window=("kaiser", 9), fs=SR)
    return signal.oaconvolve(wide, high_cut[None], "same")


dry = scene()
out = record(dry)
materialize(out)
```